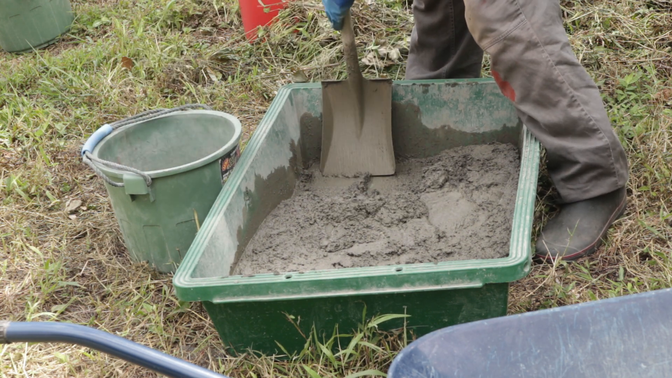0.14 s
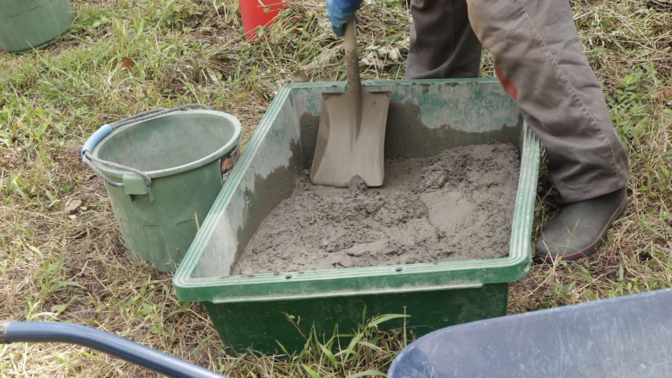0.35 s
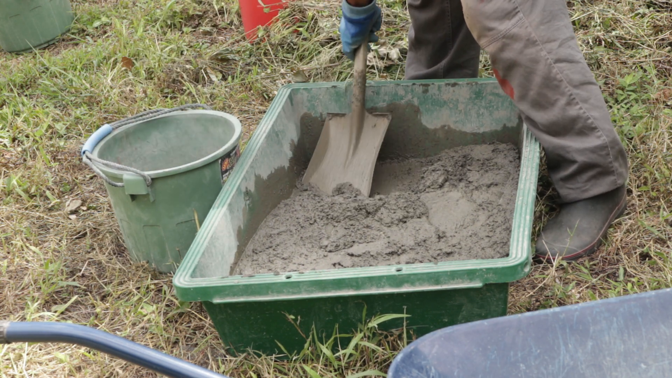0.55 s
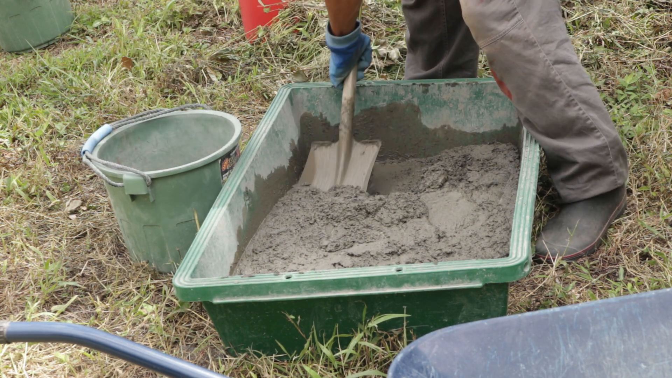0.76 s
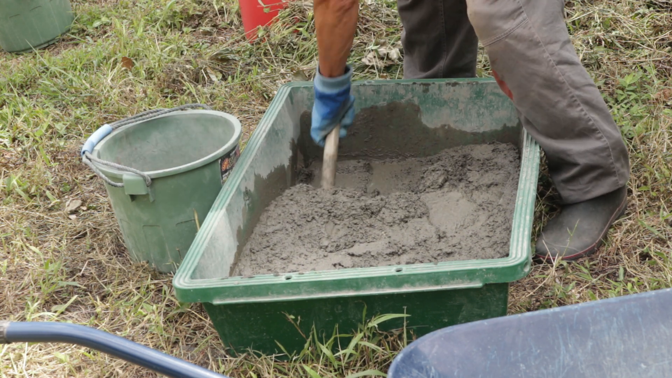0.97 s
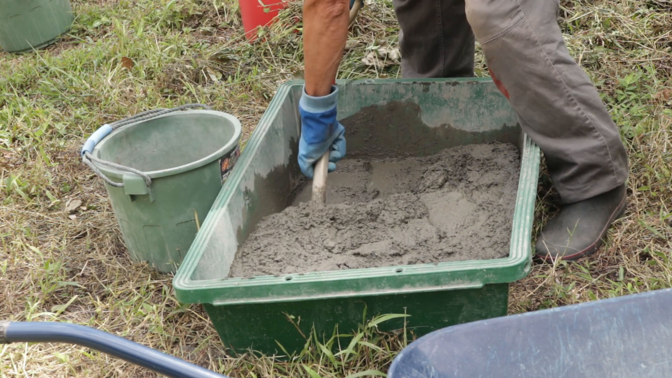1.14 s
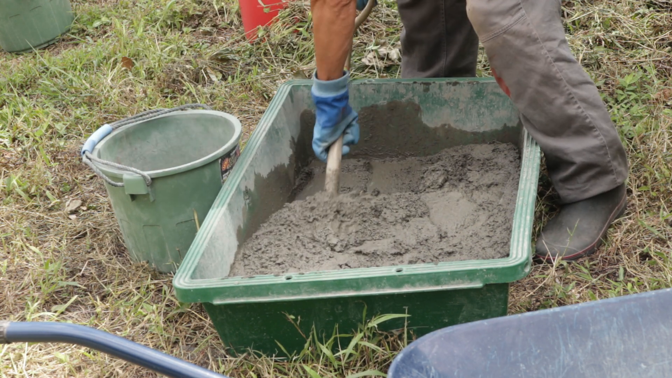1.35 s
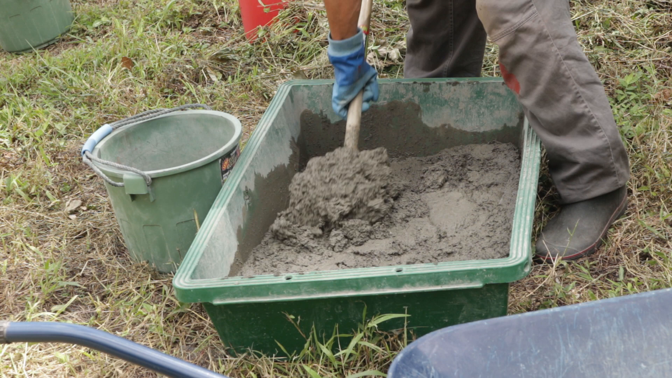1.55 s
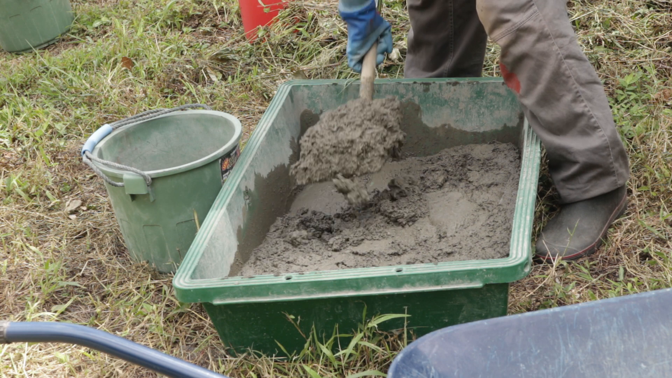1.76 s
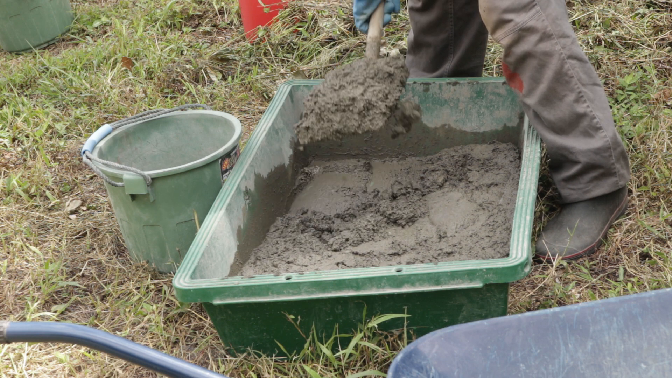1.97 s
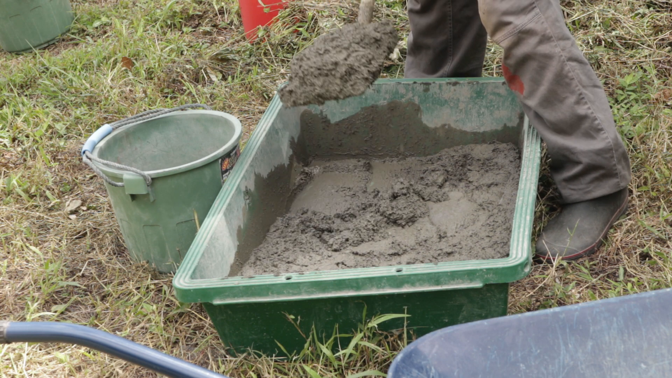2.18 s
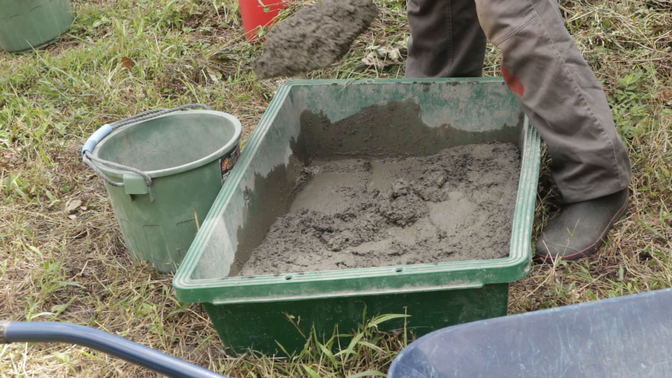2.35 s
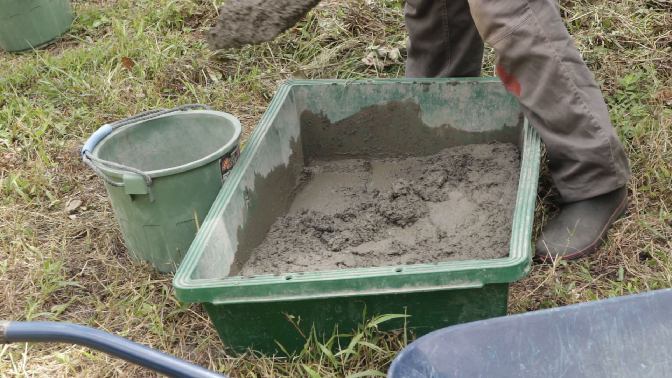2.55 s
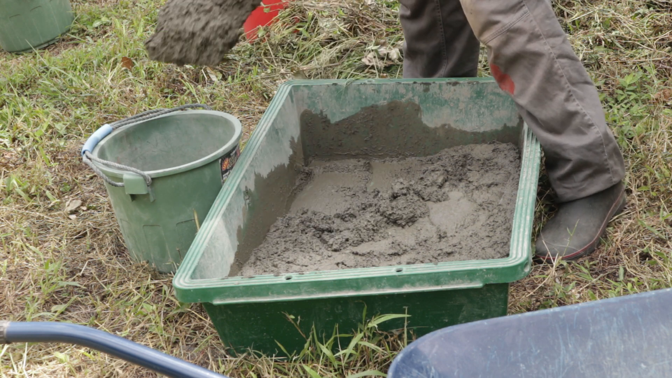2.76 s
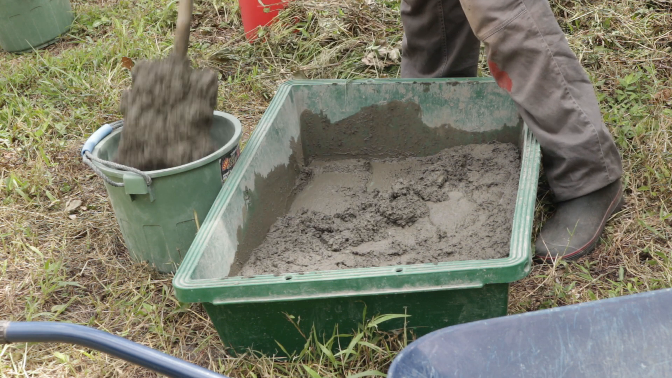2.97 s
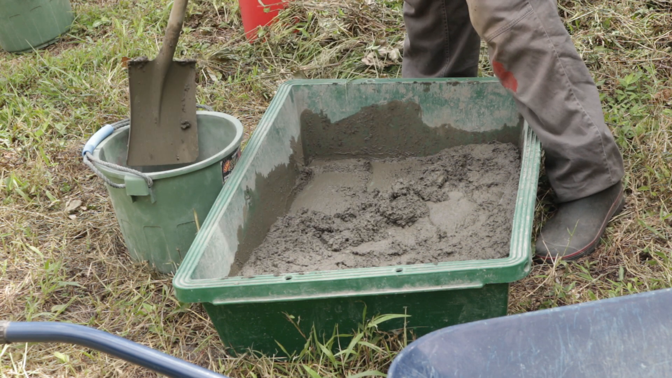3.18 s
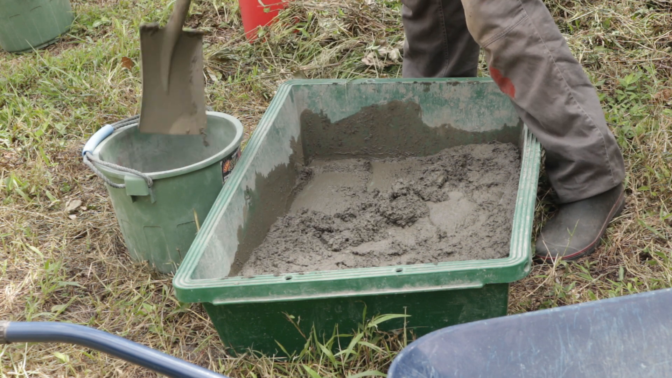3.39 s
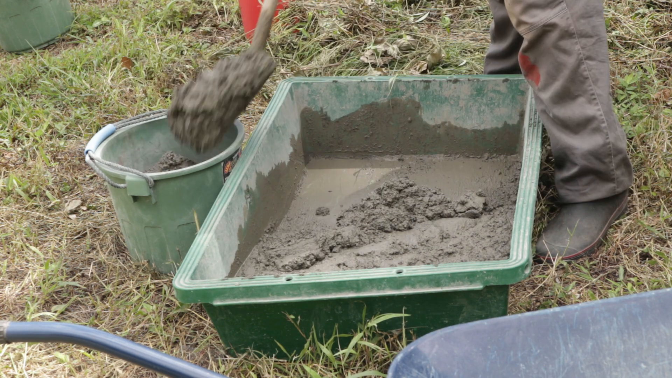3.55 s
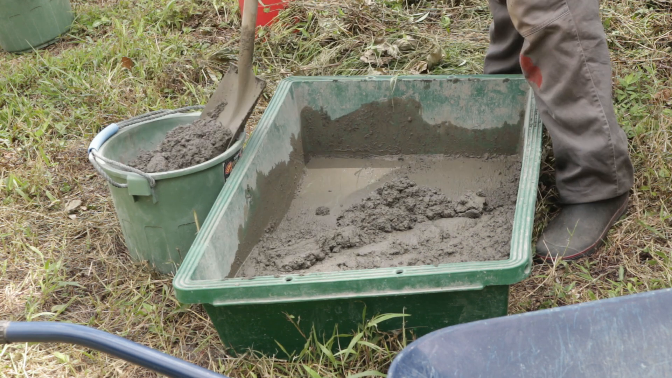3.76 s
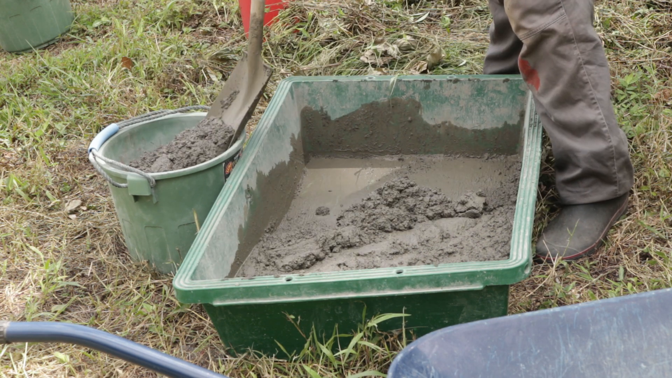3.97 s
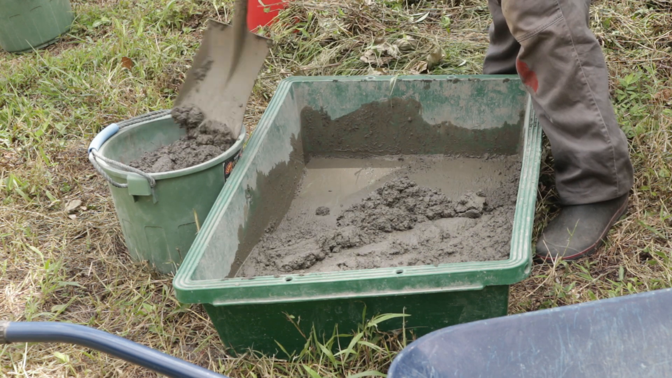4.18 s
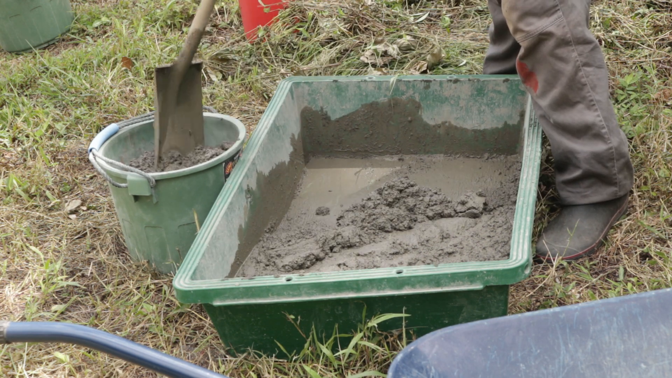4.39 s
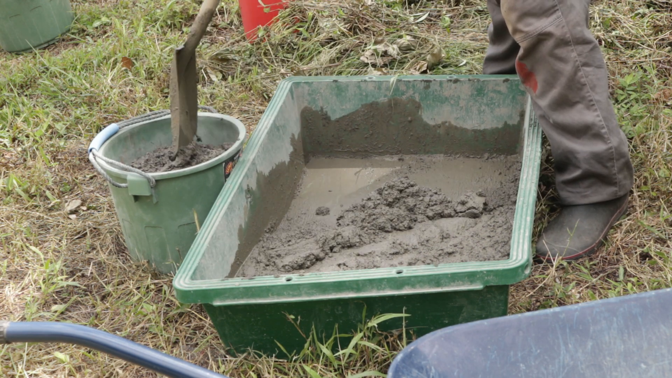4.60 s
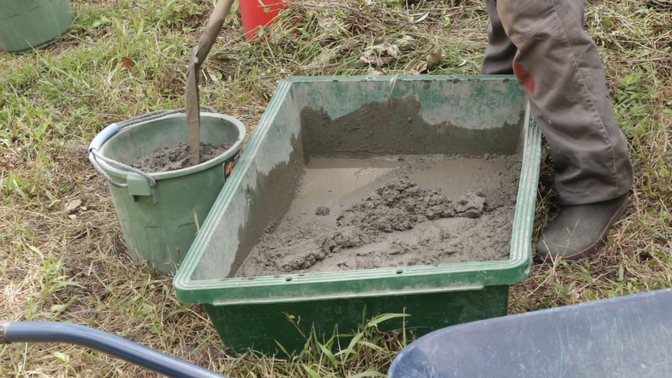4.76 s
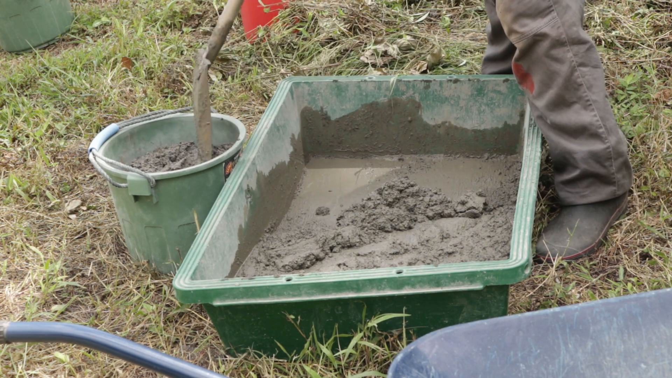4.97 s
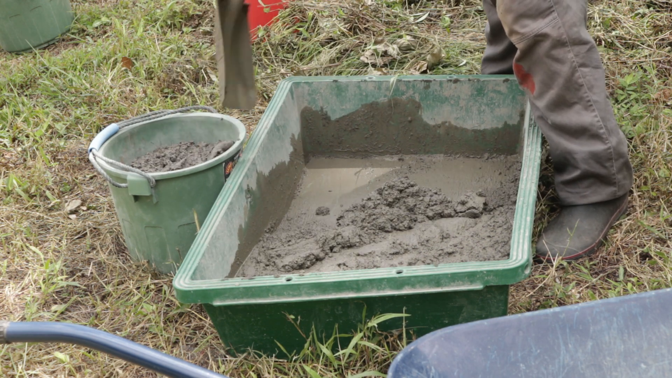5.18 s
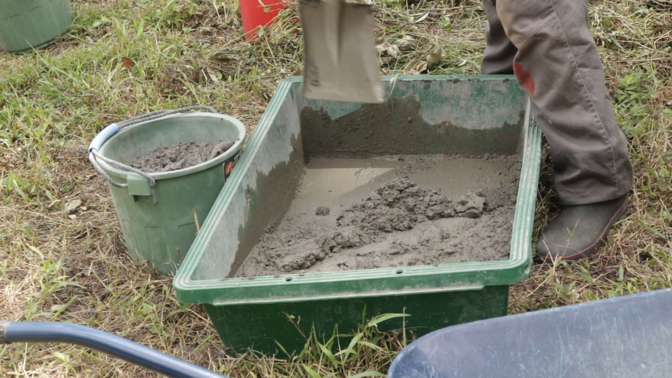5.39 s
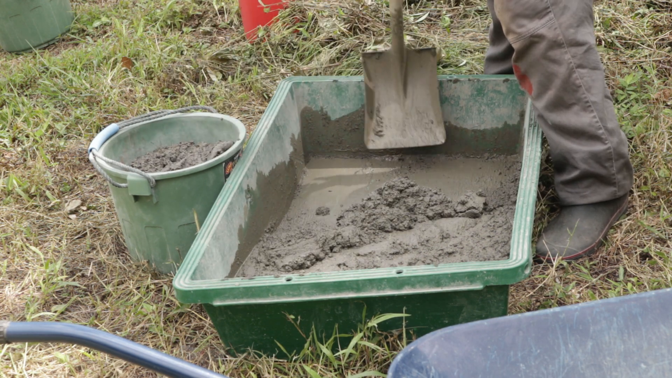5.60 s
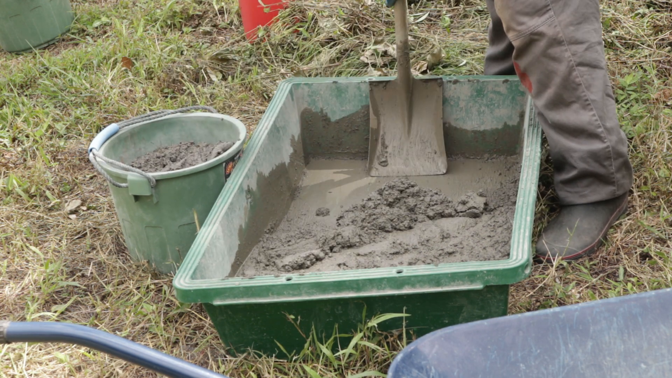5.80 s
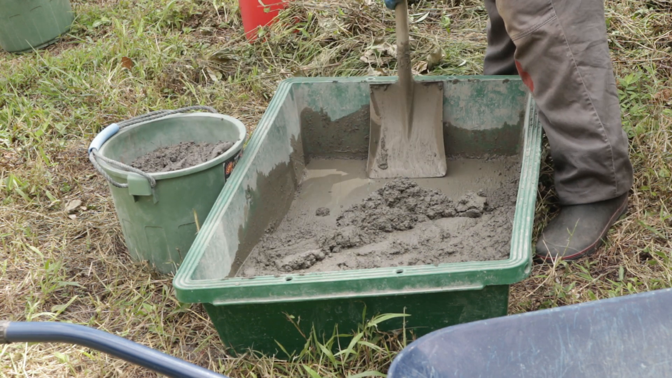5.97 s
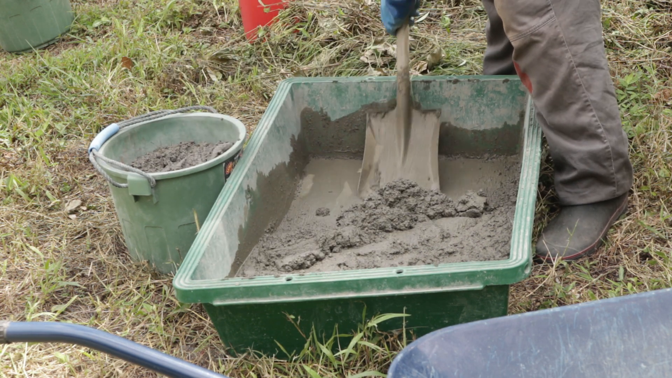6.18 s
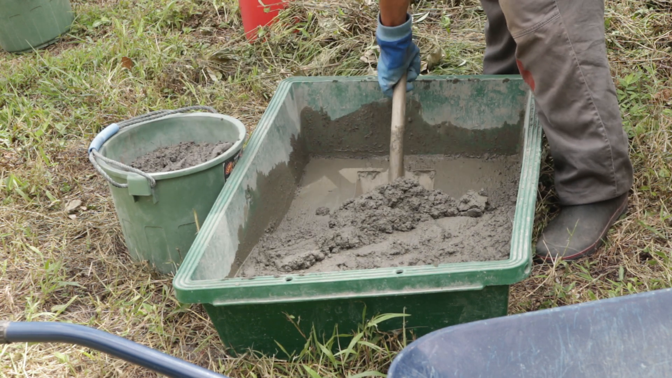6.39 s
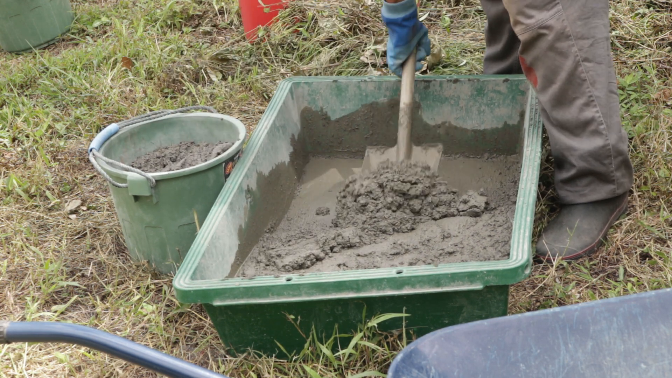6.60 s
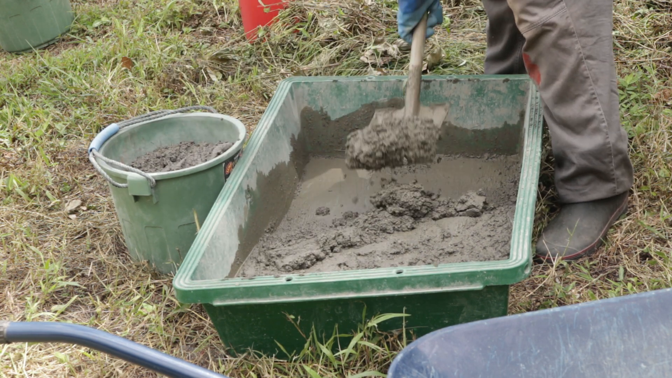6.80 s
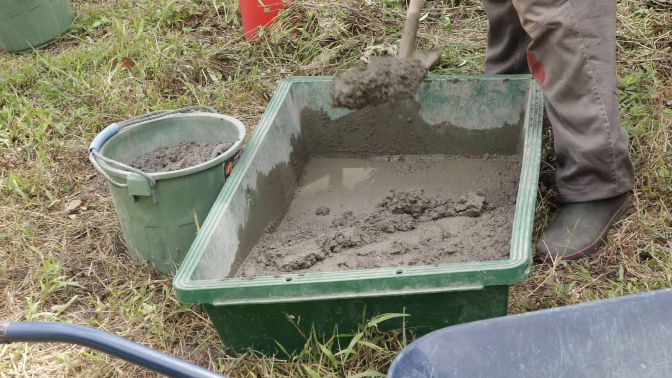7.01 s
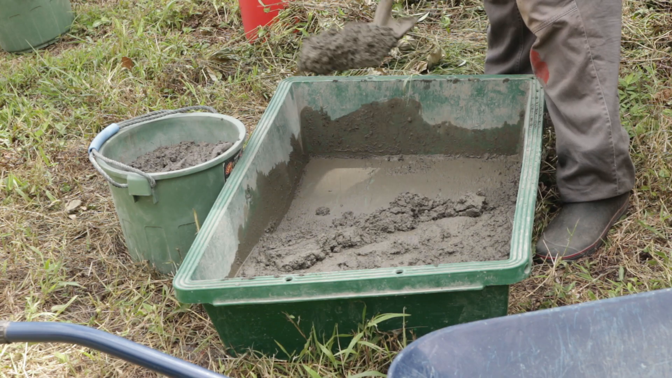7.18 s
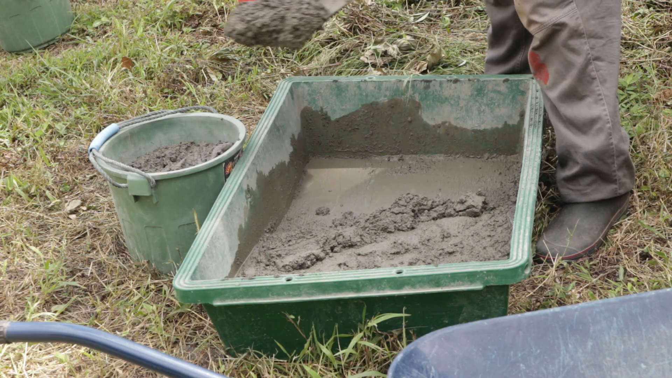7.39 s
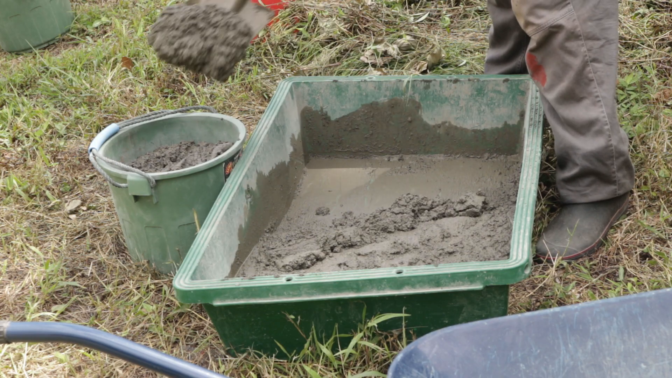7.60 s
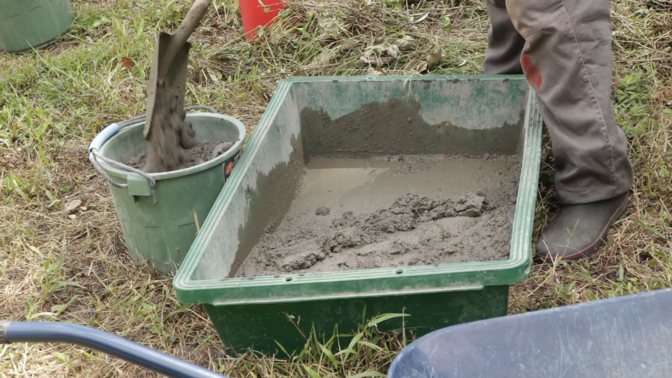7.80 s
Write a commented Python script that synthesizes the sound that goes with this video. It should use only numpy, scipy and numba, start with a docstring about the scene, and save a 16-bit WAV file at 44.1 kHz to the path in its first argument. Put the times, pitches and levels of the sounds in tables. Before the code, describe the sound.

A steel shovel knocks and scrapes along a plastic tub of wet mortar, dumps a load in a bucket and scrapes its rim, amid cicadas.

```python
"""Shovelling wet mortar among cicadas

A steel shovel knocks and scrapes along a plastic tub of wet mortar, tips a load into a bucket and is wiped on its rim.
Slipping sand grains are uneven random clicks that ring blade and plastic as decaying modes; blows are short pushes
into the same kind of modes. Near cicadas are stacks of drum partials shaped by a belly resonance, with thin whistles
beside them. The far chorus, meadow hush, insect sizzle and wind puffs on the microphone are shaped noise."""
import sys
import numpy as np
from scipy import signal
from scipy.fft import rfft, irfft
from scipy.io import wavfile
from scipy.ndimage import uniform_filter1d
from numba import njit

SR = 44100
rng = np.random.default_rng(int(sys.argv[2]) if len(sys.argv) > 2 else 0)


def wav_out(sig):
    """Save sig, one row per channel (or a flat mono array), as 16-bit PCM at SR to the path in sys.argv[1]."""
    wavfile.write(sys.argv[1], SR, np.round(np.clip(np.atleast_2d(sig).T, -1, 1) * 32767).astype(np.int16))


N = 346185
SIDES = np.array([[1], [-1]])  # a side signal adds on the left and subtracts on the right
DRUM_HZ = 168  # typical click rate of one cicada drum

# Tub walls sounding as a drum. Each row: mode in Hz, drive in dB, free ring t60 in s.
TUB_BOOM = [(75, -4.5, 0.26), (120, -2.5, 0.112), (159.5, -5, 0.13), (198.6, -5, 0.08)]
# Ringing modes of the bucket wall. Each row: mode in Hz, drive in dB, free ring t60 in s.
BUCKET = [(270, 5, 0.059), (420, -2, 0.1), (540, 1, 0.077), (874, 2.5, 0.034), (1096, -8.5, 0.047),
          (1222, -6, 0.072), (1432, -1.5, 0.032), (1594, -1, 0.025), (2074, -11.5, 0.071),
          (2610, -9.5, 0.03), (3160, -9, 0.022), (3900, -14, 0.015)]
# The bucket sounding as a drum. Each row: mode in Hz, drive in dB, free ring t60 in s.
BUCKET_BOOM = [(92.5, 7, 0.21), (150, 12.5, 0.078)]


def undb(db):
    """Gain of a dB value."""
    return 10 ** (np.asarray(db) / 20)


def unit(x):
    """Scale to rms 1."""
    return x / np.sqrt(np.mean(x ** 2))


def curves(spans):
    """Table columns drawn as lines over every sample, and a soft gate that is open inside the spans."""
    t = np.arange(N) / SR
    rows = np.vstack(spans)
    is_open = sum((t > span[0][0]) & (t < span[-1][0]) for span in spans)
    gate = uniform_filter1d(1. * is_open, size=400)
    return gate, [np.interp(t, rows[:, 0], column) for column in rows.T[1:]]


def band(x, lo_hz, hi_hz):
    """Butterworth band-pass."""
    sos = signal.butter(2, [lo_hz, min(hi_hz, .45 * SR)], "band", fs=SR, output="sos")
    return signal.sosfilt(sos, x)


def ring(x, modes):
    """A struck body: each mode is a decaying sine, and their signs alternate."""
    total = 0
    for k, (hz, db, t60) in enumerate(modes):
        pole = np.exp(2j * np.pi * hz / SR - np.log(1000) / (t60 * SR))
        total = total + (-1) ** k * undb(db) * signal.lfilter([1], [1, -pole], x).imag
    return total


@njit
def svf(x, hz, width):
    """State-variable band-pass whose centre and width in Hz may move every sample."""
    y, b, l = np.empty(len(x)), 0., 0.  # output, band state, low-pass state
    for i in range(len(x)):
        g, k = np.tan(np.pi * hz[i] / SR), width[i] / hz[i]
        v = (b + g * (x[i] - l)) / (1 + g * (g + k))
        b, l, y[i] = 2 * v - b, l + 2 * g * v, k * v
    return y


def walk(rate):
    """Random levels held 1 / rate s and slewed twice; rms 1."""
    k = int(SR / rate)
    steps = np.repeat(rng.standard_normal(N // k + 1), k)
    slewed = uniform_filter1d(uniform_filter1d(steps, k), k)
    return unit(slewed[:N])


def coloured(points, strand_db=0):
    """Noise with the given spectrum and optional narrow ridges at the multiples of the drum rate; rms 1."""
    hz, db = np.transpose(points)
    f = np.arange(1, N // 2 + 2) * SR / N
    ridges_db = strand_db * np.cos(np.pi * f / DRUM_HZ) ** 40
    gain = undb(np.interp(np.log(f), np.log(hz), db) + ridges_db)
    return unit(irfft(rfft(rng.standard_normal(N)) * gain, N))


def grains(rate, spread_db, stick_db):
    """Sand grains that catch and slip: clicks of very uneven size, louder in bunches; rate per s."""
    hardness = np.minimum(rng.exponential(size=N), 4)
    size = undb(spread_db * hardness + stick_db * walk(120))
    slips = rng.random(N) < rate / SR
    return unit(slips * size * rng.choice([-1, 1], N) + 1e-9)


def rub(sand, modes):
    """Grains catch at different spots, so every mode is kicked at its own moments."""
    return unit(sum(ring(np.roll(sand, rng.integers(N)), [mode]) for mode in modes))


def bursts(rows):
    """Quick attack, a sagging hold and a release for each (start s, length s, dB)."""
    attack_s, release_s, sag_db = 0.0078, 0.021, -4
    t = np.arange(N) / SR
    total = 0
    for s, length, db in rows:
        hold = undb(db + sag_db * np.clip((t - s) / length, 0, 1))
        attack = np.clip((t - s) / attack_s, 0, 1)
        release = np.clip(1 + (s + length - t) / release_s, 0, 1)
        total = total + hold * attack * release
    return total


def scrape():
    """Grains slipping under the dragged edge shake the tub, ring the mortar-loaded blade and hiss."""
    # The drag, one list a stroke. Each row: time in seconds, grit level in dB,
    # tub rumble against the grit in dB (high when slow and heavy).
    strokes = [
        [(0.125, -54, 8), (0.139, -30.5, -1.5), (0.19, -39, 3.5), (0.199, -28, -3), (0.213, -43, 5.5),
         (0.255, -58, 7)],
        [(0.28, -49, 1), (0.314, -34.5, 1.5), (0.42, -35.5, 2.5), (0.544, -46, 3.5), (0.564, -34.5, -1.5),
         (0.592, -36.5, 2.5), (0.618, -25.5, -12.5), (0.666, -43, -3), (0.69, -36.5, -4)],
        [(0.695, -29, -1), (0.701, -26.5, -15), (0.737, -28, 0), (0.809, -23, -18.5), (0.83, -24, -15.5),
         (0.88, -24, -16.5), (0.96, -21.5, -15), (0.985, -19, -13.5), (1.035, -17.5, -22), (1.073, -18, -21),
         (1.143, -23.5, -18), (1.165, -32.5, -15.5), (1.205, -31.5, -14), (1.235, -42, -7)],
        [(6.01, -42.5, 8.5), (6.066, -29.5, 11), (6.085, -32.5, 4), (6.11, -32, 14), (6.14, -35, 7.5),
         (6.204, -31, 7), (6.254, -23.5, -4.5), (6.34, -17, -12), (6.394, -18.5, -10), (6.456, -22.5, -14),
         (6.5, -38.5, -8)],
    ]
    # The more mortar lies on the blade, the broader its ring. Each row: time in seconds, ring width in Hz.
    damping = [(.1, 25), (.19, 30), (.3, 91), (.6, 60), (.9, 150), (1.1, 90), (6.0, 236)]
    # Modes of the steel blade. Each row: mode in Hz, drive in dB, t60 in s under the sand.
    blade = [(1070, 2, 0.019), (1279, -0.5, 0.023), (1500, -8.5, 0.064), (1623, 1.5, 0.025),
             (1750, 2.5, 0.014), (2040, 8, 0.0098), (2484, 1, 0.022), (2860, 3, 0.0097), (3335, -5, 0.021),
             (4030, 9, 0.0028), (6100, -6.5, 0.0051)]
    # The blade in the mortar. Seconds when it starts to sink, is covered, is lifted.
    buried_s = (0.97, 1.076, 1.7)
    buried_ring_db, buried_ring_hz, buried_sand_db = 6, -150, -24  # what the cover changes
    ring_base_db, ring_per_rumble = 1, 0.64  # blade ring against the grit; slower strokes ring more
    ring_base_hz, ring_hz_per_db = 688, -9  # and ring lower
    ring_loss_db = -6  # per doubling of the ring's width, up to 60 Hz
    sand_db = -11.5  # fine hiss against the grit
    lump_db = 1.2  # lumps of mortar make the drag uneven
    bare_s, bare_ring = .26, 5.7  # the blade is clean until then, and its modes ring this many times longer

    gate, (grit_db, rumble_db) = curves(strokes)
    t = np.arange(N) / SR
    buried = np.interp(t, buried_s[:2], [0, 1]) * (t < buried_s[2])
    width = np.interp(t, *np.transpose(damping))
    ring_db = ring_base_db + ring_per_rumble * rumble_db + buried_ring_db * buried
    ring_db = ring_db + ring_loss_db * np.log2(np.minimum(width / 60, 1))
    ring_hz = np.clip(ring_base_hz + ring_hz_per_db * rumble_db + buried_ring_hz * buried, 400, 1100)

    coarse, fine = grains(1300, 2.9, 2.4), grains(5000, 2.96, 0.87)
    tub = rub(fine, TUB_BOOM[2:] + [(248.4, 0.0, 0.072), (302, 6.0, 0.05), (399.6, -8.5, 0.15)])
    # mortar on the blade shifts its lowest ring
    lowest = svf(coarse + 0.87 * buried * fine, ring_hz, width)
    loaded = unit(band(lowest, 445, 986) / np.sqrt(width)) + 0.56 * unit(band(fine, 500, 1000))
    bare = rub(fine, [(hz, db, bare_ring * t60) for hz, db, t60 in blade])
    grit = np.where(t < bare_s, bare, rub(coarse, blade)) + .3 * unit(band(fine, 1200, 4500))
    sand = unit(band(grains(12000, 4.2, 0.5), 2000, 8400))

    mix = undb(rumble_db) * tub + undb(ring_db) * loaded + grit
    mix = mix + undb(sand_db + buried_sand_db * buried) * sand
    return gate * undb(grit_db + lump_db * walk(130)) * mix


def snags():
    """The edge snags: a tick, then a short ping that beats with a neighbouring mode. Early on, stones in the
    mix catch the dragged blade; from 3.2 to 4.2 s the pings ring the bucket and its rim as the load is tipped
    and the blade wiped."""
    # Snags: stones catching the blade, and from 3.2 to 4.2 s pings of the bucket and its rim. Each row: start
    # in seconds, ping peak in dB, ring in Hz.
    catches = [(0.755, -17, 1040), (0.782, -13, 1590), (0.804, -10.5, 1610), (0.847, -16.5, 1300),
               (0.868, -11.5, 1950), (0.888, -16, 2280), (0.938, -13, 2340), (0.963, -6, 2110),
               (1.017, -8, 833), (1.03, -9.5, 1900), (1.055, -12, 756), (1.068, -8, 2320),
               (1.085, -7.5, 688), (1.163, -18.5, 3000), (1.24, -19.5, 2070), (3.255, -38, 2100),
               (3.967, -30.5, 512), (4.053, -23, 570), (4.176, -21, 1500), (6.066, -17, 523),
               (6.109, -20, 700), (6.187, -21, 557), (6.326, -15, 1500)]
    cycles, tick_db, rise_s = 24, -10.5, 0.0023  # cycles to fall 60 dB; tick against ping; the edge loads up
    out = np.zeros(N)
    t = np.arange(int(.05 * SR)) / SR
    for s, db, hz in catches:
        pair = np.sin(2 * np.pi * hz * t) + 0.5 * np.sin(2 * np.pi * 1.1 * hz * t)
        ping = (1 - np.exp(-t / rise_s)) * np.exp(-np.log(1000) * t * hz / cycles) * pair
        tick = band(rng.standard_normal(len(t)) * t * np.exp(-t / 0.00096), 900, 4800)
        i = int(s * SR)
        out[i:i + len(t)] += undb(db) * (ping / np.abs(ping).max() + undb(tick_db) * tick / np.abs(tick).max())
    return out


def blows(table, body, boom, contact_ms=0.33):
    """Each blow pushes for a moment, ringing walls and drum, and crushes some grit."""
    out = np.zeros(N)
    t = np.arange(int(.3 * SR)) / SR
    push = np.sin(np.pi * np.clip(t * 1000 / contact_ms, 0, 1))

    def at_this_spot(modes, share):
        """Every spot favours other modes; a blade left resting on the plastic shortens the ring."""
        return [(hz, db + 3 * rng.standard_normal(), t60 * share) for hz, db, t60 in modes]

    for s, peak_db, boom_db, crack_db, free in table:
        share = max(free, .1)
        struck = band(ring(push, at_this_spot(body, share)), 123, 8000)
        drum = ring(push, at_this_spot(boom, share))
        crush = rng.standard_normal(len(t)) * np.minimum(t / 0.0019, 1) * np.exp(-t / (0.015 * share))
        crack = band(band(crush, 650, 3540), 780, 17000)
        i = int(s * SR)
        for db, part in ((peak_db, struck), (boom_db, drum), (crack_db, crack)):
            out[i:i + len(t)] += undb(db) * part / np.abs(part).max()
    return out


def tub_blows():
    """The shovel knocks on the plastic tub, ringing its walls."""
    # Each row: start in seconds, wall peak in dB, boom peak in dB, crack peak in dB, share of the free ring time.
    knocks = [(0.107, -10, -13.5, -26.5, 0.91), (0.201, -5, -20, -13.5, 0.65), (0.296, -23, -31, -23, 0.19),
              (0.312, -25, -20, -21, 0.81), (0.403, -14, -48, -21, 0.69), (0.615, -13.5, -31, -39, 0.45),
              (0.703, -18.5, -45, -29, 0.9), (1.239, -19.5, -61, -28.5, 0.49),
              (5.741, -10.5, -9.5, -20.5, 0.91), (5.759, -16, -14.5, -30.5, 1), (5.779, -22, -17.5, -34, 1),
              (5.884, -8, -18, -19.5, 0.75), (6.01, -19, -17.5, -30, 0.53)]
    # Ringing modes of the tub wall. Each row: mode in Hz, drive in dB, free ring t60 in s.
    wall_modes = [(268, 14, 0.021), (463, 8.5, 0.063), (610, 9.5, 0.031), (806, 8, 0.063),
                  (1090, -2.5, 0.059), (1980, -25, 0.012), (2680, -21, .03)]
    return blows(knocks, wall_modes, TUB_BOOM)


def bucket_blows():
    """The shovel knocks on the bucket, ringing its walls."""
    # Each row: start in seconds, wall peak in dB, boom peak in dB, crack peak in dB, share of the free ring time.
    knocks = [(3.717, -2.5, -18, -14, 0.58), (3.766, -35, -40, -27.5, 0.77), (3.899, -32.5, -53, -41, 0.53),
              (4.053, -25, -49, -30.5, 0.91), (4.085, -25.5, -48, -39, 0.6), (4.12, -20, -43, -26, 0.15)]
    return blows(knocks, BUCKET, BUCKET_BOOM)


def load_lands():
    """The soft load lands in the bucket: a longer contact makes a duller push."""
    # Each row: start in seconds, wall peak in dB, boom peak in dB, crack peak in dB, share of the free ring time.
    thuds = [(3.176, -18, -24, -34, 0.44), (3.184, -20, -35, -32, 0.72)]
    return blows(thuds, BUCKET, BUCKET_BOOM, contact_ms=1.1)


def slide():
    """The load pours off the blade with a wet sandy rush of grains."""
    # Mortar sliding off the blade. Each row: time in seconds, level in dB.
    pour = [(3.05, -54), (3.118, -42), (3.138, -35), (3.178, -34), (3.245, -48)]
    gate, (db,) = curves([pour])
    sand = grains(3000, 3, 2.5)
    rush = unit(band(sand, 950, 3750))
    rush = rush + 0.44 * unit(band(sand, 2800, 8500)) + 0.27 * unit(band(sand, 180, 600))
    return gate * undb(db) * rush


def wipe():
    """The edge catches and judders over the bucket rim, ringing it, and the wall rumbles under the blade."""
    # Each row: start in seconds, length in seconds, rim ring in dB, high ring in dB, rim ring in Hz.
    strokes = [(3.747, 0.071, -46, -44.5, 540), (3.875, 0.083, -45.5, -46, 567),
               (3.961, 0.065, -34.5, -40.5, 523), (4.044, 0.026, -31, -31, 567),
               (4.079, 0.036, -39, -34, 540), (4.124, 0.051, -34.5, -33, 578),
               (4.167, 0.029, -36.5, -28.5, 620), (4.208, 0.028, -43, -34, 595),
               (4.249, 0.05, -36, -38.5, 673)]
    # The blade leans on the bucket wall. One row: start in seconds, length in seconds, rumble in dB.
    lean = (4.05, 0.256, -40)
    splash_db = -20.5  # sand splashing off, against the high ring
    judder = grains(1000, 3.2, 3)
    rows = np.array(strokes)
    middle_s = rows[:, 0] + rows[:, 1] / 2
    rim_hz = np.interp(np.arange(N) / SR, middle_s, rows[:, 4])
    width = np.full(N, 35.)  # Hz
    wall = rub(judder, BUCKET[:1])
    rim = unit(svf(judder, rim_hz, width))
    high = rub(judder, BUCKET[4:]) + undb(splash_db) * unit(band(judder, 1900, 7100))
    return bursts([lean]) * wall + bursts(rows[:, :3]) * rim + bursts(rows[:, [0, 1, 3]]) * high


def ports(near):
    """The work lies a little to the right; reflections off tub and ground differ at the two microphone ports."""
    t = np.arange(int(.05 * SR)) / SR
    echoes = unit(rng.standard_normal(len(t)) * np.exp(-t / .012)) / np.sqrt(len(t))
    scatter = signal.fftconvolve(near, echoes)[:N]
    side = undb(-6.5) * band(scatter, 3400, 15000) + undb(-16.5) * band(scatter, 270, 1700)
    side = side - 0.034 * near - 0.14 * band(near, 820, 12000)
    return near + side * SIDES


def notes():
    """Two drums click in turn and in opposite sense, so odd partials lead; the belly picks out a band."""
    # Notes of the near cicadas. Each row: start in seconds, end in seconds, belly in Hz held, level in dB.
    calls = [(1.96, 2.228, 4200, -53), (2.58, 3.097, 5050, -58), (3.42, 3.72, 4870, -52),
             (3.72, 3.967, 4540, -46.5), (4.0, 4.175, 4870, -53), (4.27, 4.527, 4540, -43),
             (4.53, 4.8, 3670, -52), (4.56, 4.82, 4870, -52), (4.831, 5.07, 4540, -41),
             (5.303, 5.464, 4870, -47.5), (5.36, 5.626, 4540, -42.5), (5.875, 6.182, 4870, -44.5),
             (6.53, 6.723, 4630, -45), (6.74, 7.053, 3860, -61), (7.02, 7.274, 4540, -41),
             (7.27, 7.4, 5000, -50), (7.6, 7.786, 4705, -42)]
    # The nearest cicadas. Each row: belly in Hz held, belly in Hz at the start of a note, side share.
    singers = [(3860, 3100, -0.5), (4200, 3200, -2.4), (4540, 3500, 0.7), (4870, 3700, -2.5)]
    blur = .5  # the drums drift off their beat (rms radians at the 27th partial)
    out = np.zeros((2, N))
    k = np.arange(15, 41)[:, None]  # partial numbers
    unsteady = walk(50)
    for start, end, hold_hz, db in calls:
        _, from_hz, side = min(singers, key=lambda singer: abs(singer[0] - hold_hz))
        t = np.arange(int((end - start) * SR)) / SR
        i = int(start * SR)
        rate_hz = hold_hz / (2 * round(hold_hz / DRUM_HZ / 2 - .5) + 1)  # the held note is an odd partial
        partial_hz = k * rate_hz
        belly_hz = hold_hz + (from_hz - hold_hz) * np.exp(-t / 0.029)
        luck = rng.standard_normal((len(k), 3))
        drum = undb(-12 + 3 * luck[:, :1]) / (1 + ((partial_hz - 4200) / 1100) ** 2)
        belly = 1 / (1 + ((partial_hz - belly_hz) / 230) ** 2)
        gain = (belly + drum) * undb(-7 * (k % 2 == 0))
        phase = 2 * np.pi * (partial_hz * (t + 0.00681 * t ** 2 / t[-1]) + luck[:, 2:])  # drums speed up a little
        phase = phase + k / 27 * blur * unsteady[i:][:len(t)]
        waver = undb(2.5 * np.sin(2 * np.pi * 8 * luck[:, 1:2] * t + 3 * luck[:, 2:]))
        shape = np.clip(t / 0.018, 0, 1) * np.clip((t[-1] - t) / 0.024, 0, 1)
        mid = (gain * waver * np.sin(phase)).sum(axis=0)
        wide = side * (gain * np.sin(phase + luck[:, 1:2])).sum(axis=0)  # echoes turn each partial its own way
        out[:, i:i + len(t)] += undb(db) * shape * np.array([mid + wide, mid - wide]) / mid.std()
    return out


def swings():
    """A thin whistle creeps up to a knee, then leaps toward the belly note, swells and throbs."""
    # Each row: start in seconds, knee in seconds, end in seconds, first pitch in Hz, level in dB before the swell.
    whistles = [(2.35, 2.525, 2.72, 1620, -59), (4.68, 4.79, 4.85, 1550, -57),
                (4.9, 5.015, 5.055, 1540, -55.5), (5.8, 5.95, 5.99, 1500, -58.5),
                (6.86, 7.03, 7.068, 1480, -58), (7.55, 7.715, 7.76, 1500, -58)]
    knee_hz, leap_hz, leap_s = 2050, 4800, .06  # pitch at the knee; pitch aimed at and time constant of the leap
    buzz = 1.5  # depth of the drum's throb at a full leap
    out = np.zeros(N)
    for start, knee, end, from_hz, db in whistles:
        t = np.arange(start, end, 1 / SR)
        leap = 1 - np.exp(-np.maximum(t - knee, 0) / leap_s)
        creep = np.interp(t, [start, knee], [0, 1]) ** 1.6
        hz = from_hz + (knee_hz - from_hz) * creep + (leap_hz - knee_hz) * leap
        fades = np.clip(np.minimum((t - start) / .04, (end - t) / .01), 0, 1)
        swell = undb(np.interp(t, [start, knee], [3, 7]) + 8 * leap)
        throb = 1 + buzz * leap * np.cos(2 * np.pi * DRUM_HZ * t)
        i = int(start * SR)
        out[i:i + len(t)] += undb(db) * fades * swell * np.sin(2 * np.pi * np.cumsum(hz) / SR) * throb
    return out * undb(2 * walk(150))


def far_chorus():
    """Far cicadas from all sides: noise in which their drum partials stand out as thin strands."""
    # Chorus spectrum. Each row: frequency in Hz, relative density in dB per Hz.
    spectrum = [(1060, -12.5), (1800, -10), (2900, -3), (3190, 2), (4680, 2.5), (6660, -9), (7500, -65),
                (9750, -115)]
    # Swell of the chorus, in three lists. Each row: time in seconds, level in dB.
    swell = [
        [(0, -41), (.7, -41.5)],
        [(1.34, -68), (1.7, -51.5), (1.96, -45), (3.51, -43.5), (3.72, -39.5), (4.44, -39), (5.2, -42),
         (5.7, -41)],
        [(6.55, -38), (6.686, -38.5), (7.538, -41.5), (7.85, -37.5)],
    ]
    strand_db = 11  # ridge height
    chorus_db = curves(swell)[1][0]
    middle, side = coloured(spectrum, strand_db), coloured(spectrum, strand_db)
    return undb(chorus_db) * (0.63 * middle + 0.61 * SIDES * side)


def hush():
    """Meadow hush: steady coloured noise, middle and side, that sways slowly together."""
    # Hush spectrum in the middle. Each row: frequency in Hz, relative density in dB per Hz.
    mid_spectrum = [(15, -31), (25, -6.5), (85, -2), (549, -9.5), (1250, -15.5), (2930, -14.5),
                    (3880, -10.5), (4910, -15.5), (7000, -20), (9100, -61), (15400, -120)]
    # Hush spectrum at the sides. Each row: frequency in Hz, relative density in dB per Hz.
    side_spectrum = [(15, -72), (25, -53), (204, -13), (376, -16), (499, -15), (1870, -27), (4580, 0),
                     (7000, -10.5), (9100, -22.5), (15400, -120)]
    mid_db, side_db, sway_db = -47.5, -42, .8
    steady = undb(mid_db) * coloured(mid_spectrum) + undb(side_db) * SIDES * coloured(side_spectrum)
    return steady * undb(sway_db * walk(3.96))


def insect_sizzle():
    """High sizzle of small insects: wide treble noise whose middle flickers."""
    # Each row: time in seconds, level in dB.
    level = [(0, -63), (2.5, -67), (4.2, -58.5), (5.5, -62.5), (7.8, -62)]
    # Sizzle spectrum. Each row: frequency in Hz, relative density in dB per Hz.
    spectrum = [(7000, -6), (9030, -13.5), (12800, -0.5), (14600, -9), (15600, -8.5)]
    sizzle_db = curves([level])[1][0]
    middle = undb(2.5 * walk(25)) * coloured(spectrum)
    return undb(sizzle_db) * (middle + 2.4 * SIDES * coloured(spectrum))


def wind_puffs():
    """Wind puffs on the microphone: fluttering low noise that swells with every gust."""
    # Each row: middle in seconds, half length in seconds, level in dB.
    gusts = [(2.98, 0.16, -42.5), (3.35, 0.23, -43), (3.694, 0.047, -34.5), (4.4, 0.11, -48.5),
             (4.967, 0.065, -42), (5.552, 0.26, -51.5), (6.938, 0.091, -54)]
    air_db = -58.5  # light air between the gusts
    t = np.arange(N) / SR
    wind = undb(air_db) + sum(undb(db) * np.exp(-((t - s) / half) ** 2) for s, half, db in gusts)
    puffs = [unit(band(rng.standard_normal(N), 34.0, 78.5) * undb(3.7 * walk(22))) for _ in range(2)]
    return wind * (puffs[0] + 0.11 * SIDES * puffs[1])


def scene():
    """Work in front, insects and wind around."""
    work = scrape() + snags() + tub_blows() + bucket_blows() + load_lands() + slide() + wipe()
    work = ports(band(work, 55, 16500))
    whistles = swings() * np.array([[1.2], [.8]])  # a little to the left
    field = far_chorus() + hush() + insect_sizzle() + wind_puffs()
    return work + notes() + whistles + field * np.array([[.94], [1.06]])


def record(dry):
    """A steep elliptic low-pass cuts the top."""
    top_hz = 15450
    return signal.sosfilt(signal.ellip(10, .2, 80, top_hz, fs=SR, output="sos"), dry)


dry = scene()
out = record(dry)
wav_out(out)
```